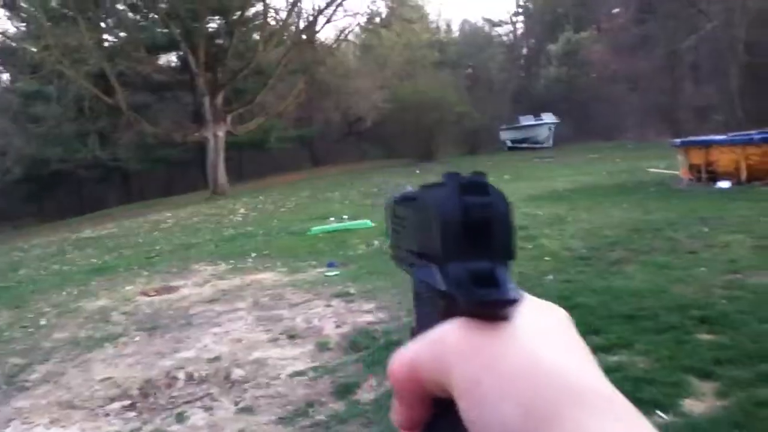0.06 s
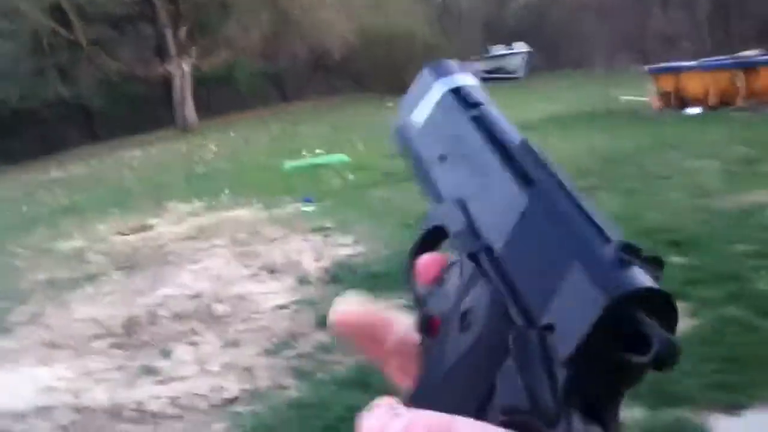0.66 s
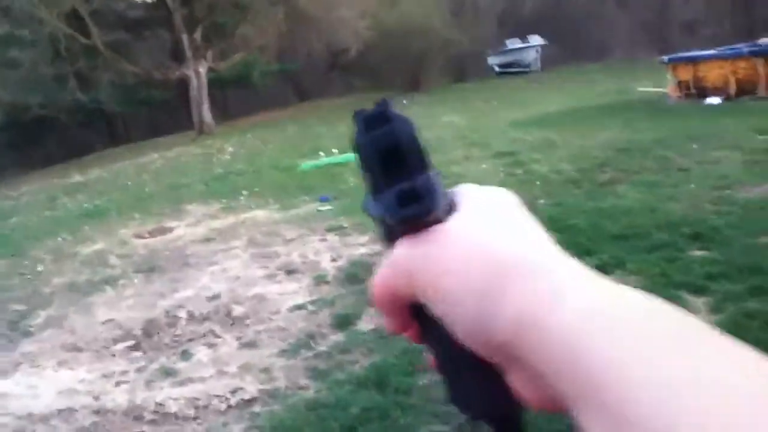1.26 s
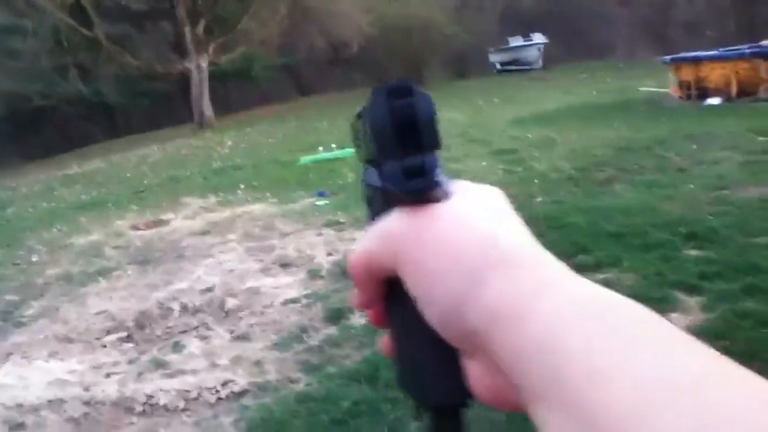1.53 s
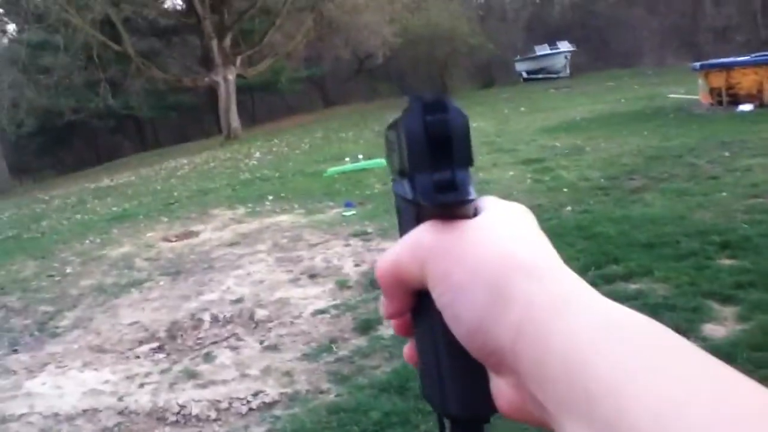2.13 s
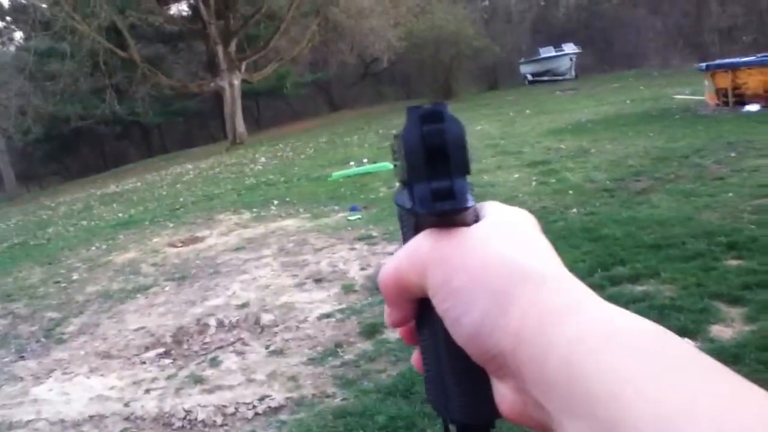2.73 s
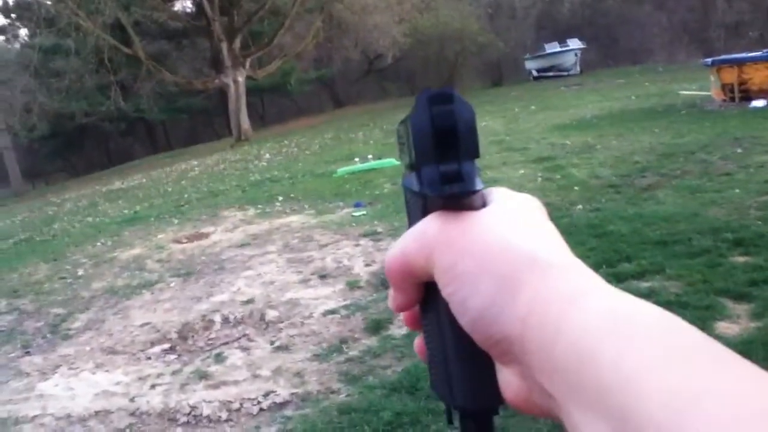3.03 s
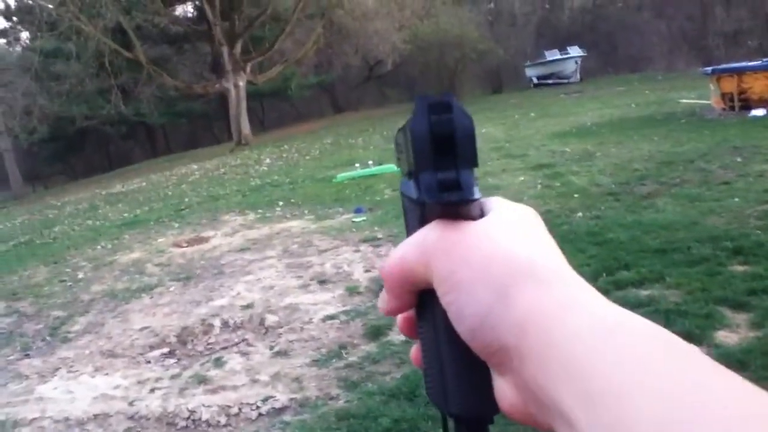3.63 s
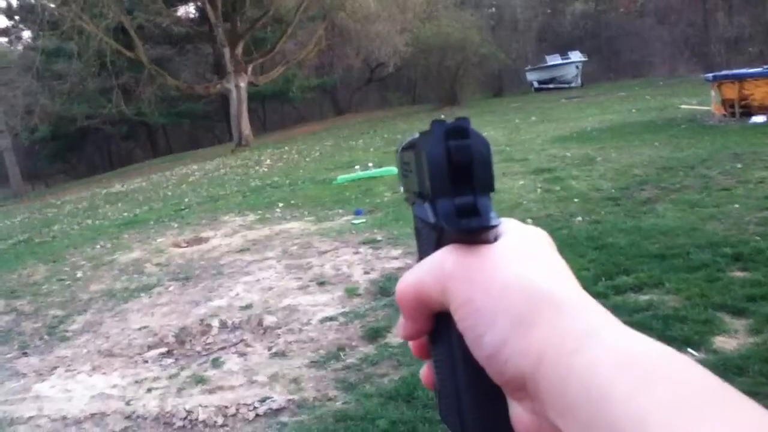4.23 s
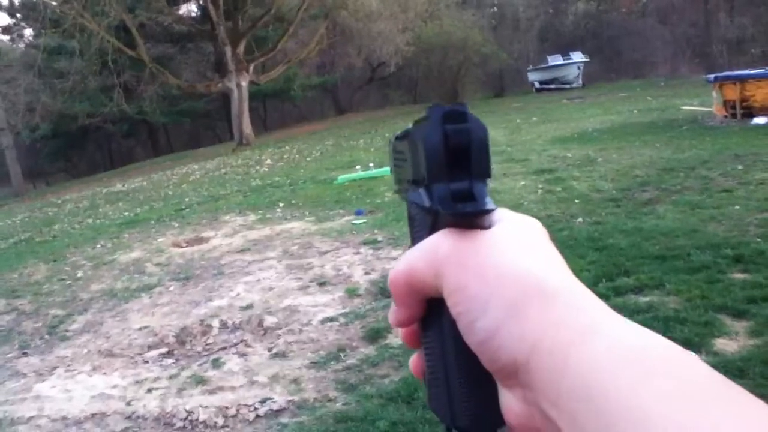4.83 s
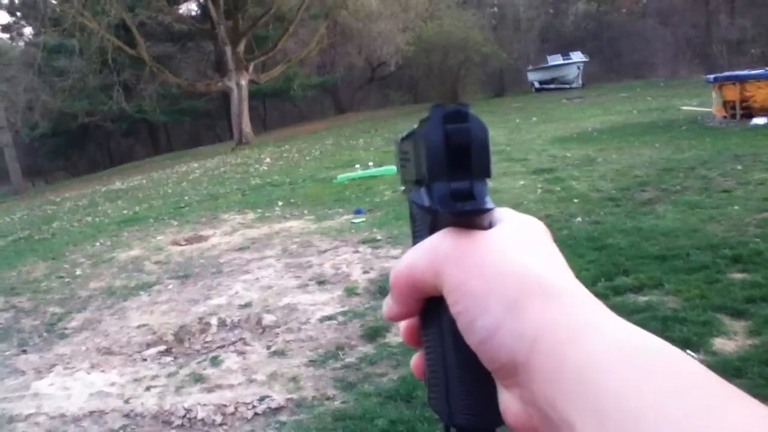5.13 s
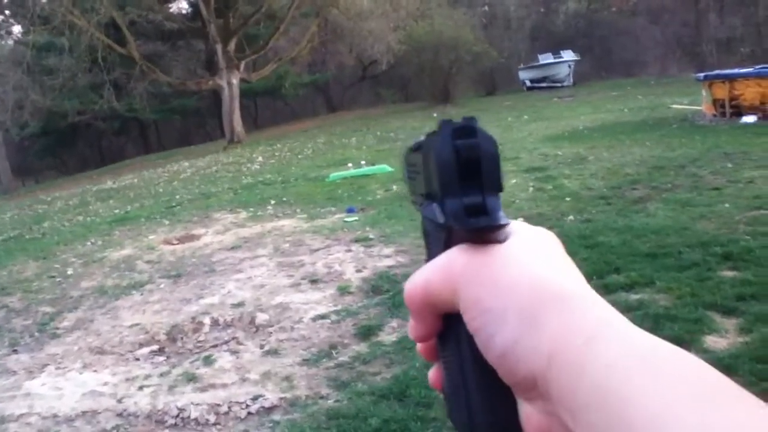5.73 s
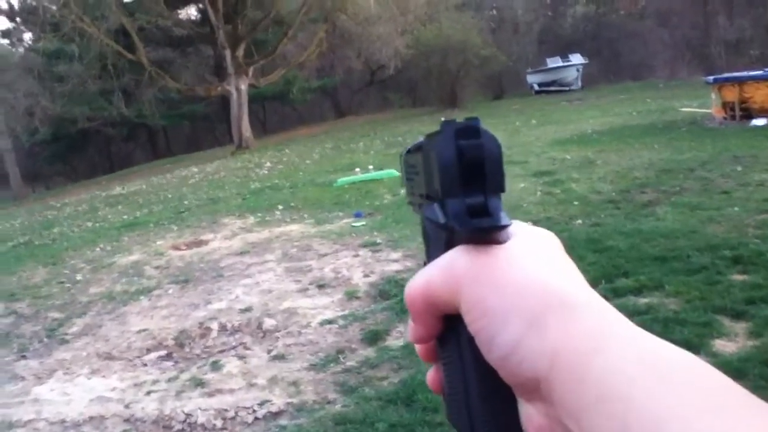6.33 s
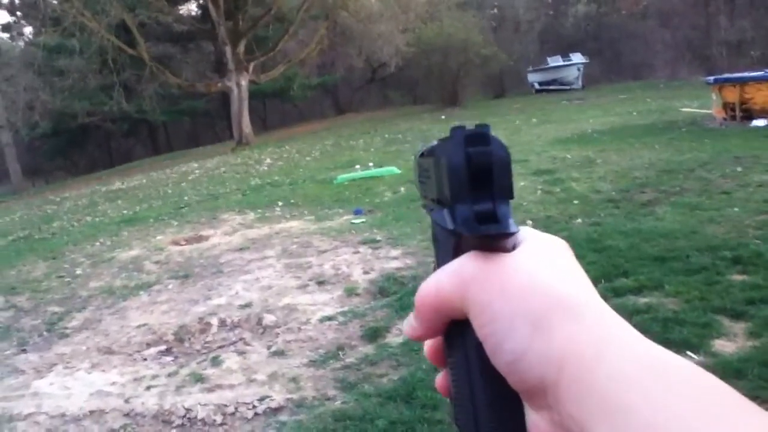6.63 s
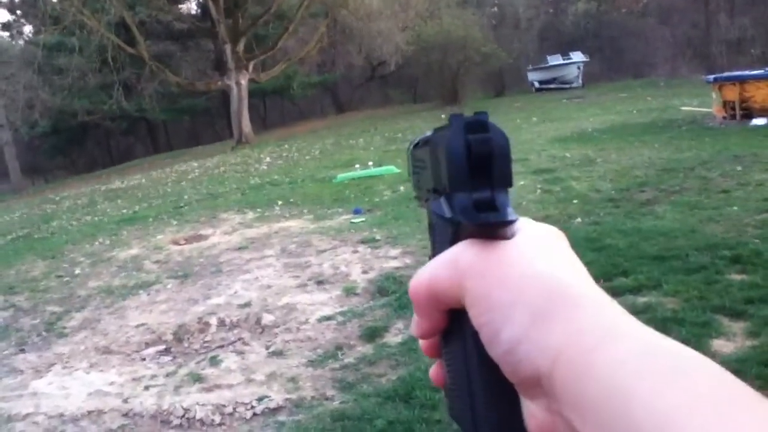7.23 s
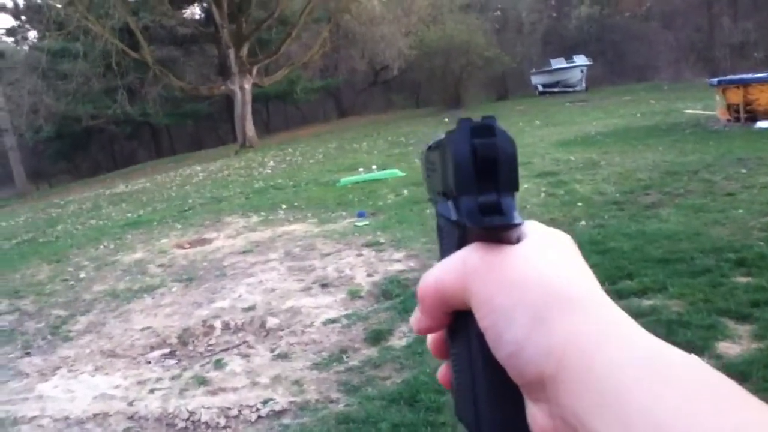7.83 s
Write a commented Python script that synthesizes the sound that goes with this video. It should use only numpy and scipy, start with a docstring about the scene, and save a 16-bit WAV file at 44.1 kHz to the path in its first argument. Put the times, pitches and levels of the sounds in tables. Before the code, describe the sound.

Faint songbirds repeat short, high phrases outdoors over a distant rumble and an even hiss, singing on and off until about 6 seconds. In the first second a pistol knocks lightly in the hand, most clearly at 0.6 seconds. At 2.8 seconds its trigger clicks and the mechanism cocks with a slight springy ring. The gas-powered BB pistol then fires close by at about 3.2, 4.8, 6.3 and 7.5 seconds, each shot a sharp burst of gas with a thump and snap, followed by a short wash of echoes from the trees. Between shots the trigger clicks back, settles, and clicks and cocks again. At 6.4 seconds, just after the third shot, a BB cracks against a hollow target that rattles and booms. The overall volume drops at each shot and slowly creeps back.

```python
"""A gas-powered BB pistol is cocked and fired four times, at arm's length, on a lawn edged by woods.
Each shot is a burst of CO2 gas, a thump and a snap, which the lawn and the trees scatter back.
Small sprung parts click between shots, and one BB hits a hollow target that rattles and booms.
Songbirds repeat short phrases, some of them slowing, over a distant rumble and an even hiss.
An automatic volume control turns everything down at each shot and lets it creep back."""
import sys
import numpy as np
from scipy import signal
from scipy.fft import rfft, irfft, next_fast_len
from scipy.io import wavfile
from scipy.ndimage import uniform_filter1d, minimum_filter1d

SR = 44100
rng = np.random.default_rng(int(sys.argv[2]) if len(sys.argv) > 2 else 0)


def inscribe(sig):
    """Save sig as 16-bit PCM at rate SR to the path in sys.argv[1].

    A 1-D sig is mono; a 2-D sig holds one channel per row.
    Samples are clipped to [-1, 1] before scaling.
    """
    pcm = np.round(np.clip(np.atleast_2d(sig).T, -1, 1) * 32767)
    wavfile.write(sys.argv[1], SR, pcm.astype(np.int16))


N = 346978
T = np.arange(2 ** 16) / SR  # seconds since the start of one event


def undb(db):
    """Turn decibels into a number to multiply by."""
    return 10 ** (np.asarray(db) / 20)


def add(out, start_s, x):
    """Mix x into out, beginning at start_s."""
    i = max(int(start_s * SR), 0)
    out[i:i + len(x)] += x[:max(len(out) - i, 0)]


def level(x, db):
    """Scale x to an average (rms) level."""
    return x * undb(db) / np.sqrt(np.mean(x ** 2))


def burst(x, db):
    """Scale a short sound to the energy of one millisecond at this level."""
    return x * undb(db) / np.sqrt(np.sum(x ** 2) * 1000 / SR)


def colour(x, spectrum, tilt_db=0):
    """Filter x through (pitch_hz, level_db) points, made brighter by tilt_db per octave."""
    size = next_fast_len(len(x) // 2 + 1) * 2
    octave = np.log2(np.maximum(np.fft.rfftfreq(size, 1 / SR), 1))
    hz, db = np.transpose(spectrum)
    slope_db = tilt_db * np.maximum(octave, np.log2(hz[0]))
    gain = level(undb(np.interp(octave, np.log2(hz), db) + slope_db), 0)
    # this fold makes the filter ring only after a sound, never before it
    cepstrum = irfft(np.log(gain))
    cepstrum[1:size // 2] *= 2
    cepstrum[size // 2 + 1:] = 0
    return irfft(rfft(x, size) * np.exp(rfft(cepstrum)))[:len(x)]


def grit(spread_db):
    """Noise made of tiny impacts of uneven size."""
    return level(rng.standard_normal(len(T)) * undb(spread_db * rng.standard_normal(len(T))), 0)


def ring(tones, size=4096):
    """A struck part rings with its own tones; the wider a tone, the sooner it dies."""
    t = T[:size]
    return sum((-1) ** k * undb(db) * width * np.exp(-np.pi * width * t) * np.sin(2 * np.pi * hz * t)
               for k, (hz, width, db) in enumerate(tones))


def contact(chatter, decay_s, size=4096):
    """One hard hit followed by dying chatter."""
    force = rng.standard_normal(size) * np.exp(-T[:size] / decay_s)
    force *= chatter / np.sqrt(np.sum(force ** 2))
    force[0] += 1
    return force


def outdoors(x, echo_db, decay_s):
    """A sound with a soft tail of reflections."""
    tail = rng.standard_normal(len(T)) * np.exp(-T / decay_s) * (1 - np.exp(-T / .01))
    return x + undb(echo_db) * signal.fftconvolve(x, tail / np.sqrt(np.sum(tail ** 2)))[:N]


# tone colour of the distant rumble and hiss: pitch_hz, level_db
AIR_SPECTRUM = [(15, -52.5), (25, -16.5), (105, -2), (149, -1), (489, -16), (911, -13.5), (1940, -21),
                (2220, -23), (2610, -24), (2840, -27.5), (4740, -29), (6920, -30.5), (10700, -32.5),
                (14800, -36.5), (16000, -41.5)]


def air(level_db=-49.5):
    """A far rumble swells gently under an even hiss."""
    swell_db = .5 * np.interp(np.arange(N), np.linspace(0, N, 40), rng.standard_normal(40))
    noise = level(colour(rng.standard_normal(N), AIR_SPECTRUM), level_db)
    rumble = signal.sosfilt(signal.butter(1, 1200, fs=SR, output="sos"), noise)
    return noise + rumble * (undb(swell_db) - 1)


def note(glide, pitch_ratio, waver=.018):
    """A bird's nearly pure tone follows a pitch glide, unsteady and a little different every time."""
    times, hz = np.transpose(glide)
    t = np.arange(times[0], times[-1], 1 / SR)
    pitch_flutter = np.interp(t - times[0], np.arange(128) / 300, rng.standard_normal(128))
    level_flutter = np.interp(t - times[0], np.arange(128) / 300, rng.standard_normal(128))
    sung_hz = pitch_ratio * hz * (1 + waver * rng.standard_normal(len(hz)))
    pitch = uniform_filter1d(np.interp(t, times, sung_hz), SR // 400) * (1 + .02 * pitch_flutter)
    tone = np.sin(2 * np.pi * np.cumsum(pitch) / SR) * undb(3.5 * level_flutter)
    return tone * signal.windows.tukey(len(t), .45)


def whistle(length_s, pitch_hz, db):
    """A plain whistle that rises and falls slightly."""
    arch = [(0, .96 * pitch_hz), (length_s / 3, 1.015 * pitch_hz), (length_s, .98 * pitch_hz)]
    return undb(db) * note(arch, 1)


def phrase_fade(k, count, peak, fade_db=-2):
    """Change in dB of note k: none at the peak, fade_db half a phrase away from it."""
    return fade_db * (2 * (k / (count - 1) - peak)) ** 2


# the six pitch glides that make up one syllable of song: offset_s, pitch_hz
LEAD_IN_GLIDE = [(-.03, 2430), (-.018, 2500), (-.006, 2700)]
FLICK_GLIDE = [(-.008, 5000), (-.002, 5800), (.004, 6900)]
WARBLE_GLIDE = [(-.002, 4150), (.012, 3680), (.024, 3000), (.03, 3150), (.037, 2800), (.046, 2680),
                (.056, 2200)]
TURN_GLIDE = [(.022, 3200), (.031, 3950), (.037, 3520), (.045, 3400), (.054, 2950)]
ARCH_GLIDE = [(-.028, 4550), (-.017, 4790), (-.006, 4680), (0, 4750)]
DIP_GLIDE = [(.001, 4800), (.008, 4580), (.017, 4520), (.025, 4750)]
# song phrases: start_s, syllables (to be rounded), first_gap_s, gap_growth_s, pitch_ratio,
# loudest_point (0 to 1), warble_db, whistle_db, lead_in_db
SONG_PHRASES = [(.054, 5.8, .168, -.002, .985, .25, -46, -46.5, -54.5),
                (1.982, 4.7, 0.14, 0.0075, 1.01, 0.76, -50.5, -61, -51),
                (3.553, 6, .125, .01, 1.01, 0.4, -46.5, -52.5, -58),
                (5.317, 5.2, 0.16, -0.0000085, 1.01, 0.18, -48, -56.5, -54),
                (5.39, 2, .135, 0, 1.13, 0.38, -52, -66, -63)]


def birds():
    """Birds sing with both sides of the voice box, pipe and call; the woods blur it all."""
    out = np.zeros(N)
    for start_s, syllables, gap_s, growth_s, ratio, peak, warble_db, whistle_db, lead_db in SONG_PHRASES:
        count = round(syllables)
        parts = [(LEAD_IN_GLIDE, lead_db), (FLICK_GLIDE, lead_db - 9),
                 (WARBLE_GLIDE, warble_db), (TURN_GLIDE, warble_db - 3),
                 (ARCH_GLIDE, whistle_db - 2), (DIP_GLIDE, whistle_db)]
        for k in range(count):
            syllable_s = start_s + k * gap_s + growth_s * k * (k - 1) / 2
            pitch_ratio = ratio * (1 + .01 * rng.standard_normal())
            for glide, db in parts:
                gain = undb(db + phrase_fade(k, count, peak))
                add(out, syllable_s + glide[0][0], gain * note(glide, pitch_ratio, waver=.0072))
    for k in range(4):  # evenly spaced piping
        piping_db = -49 + phrase_fade(k, count=4, peak=.48)
        add(out, .466 + k * .155, whistle(length_s=.058, pitch_hz=2930, db=piping_db))
    add(out, 4.64, whistle(length_s=.13, pitch_hz=1280, db=-55))  # one low, far call
    through_leaves = outdoors(out, echo_db=-8, decay_s=.007)
    return outdoors(through_leaves, echo_db=-9, decay_s=.1)


# tone colour of a shot scattered by the lawn: pitch_hz, level_db
LAWN_SPECTRUM = [(40, -48.5), (100, -19), (250, -4), (400, -5), (1000, -9), (2100, -4.5), (3200, -9),
                 (7400, -8), (10000, -17), (16000, -41.5)]


def lawn(fade_from_s=.02, db=-10, falloff=1.64):
    """The ground nearby scatters a shot back, weaker the farther the sound has travelled."""
    arrival = 1 / (1 + (.0185 / (T + 1 / SR)) ** 14)
    fade = np.maximum(T / fade_from_s, 1) ** -falloff
    return undb(db) * colour(grit(spread_db=2) * arrival * fade, LAWN_SPECTRUM)


# tone colour of a shot scattered by the woods: pitch_hz, level_db
WOODS_SPECTRUM = [(150, -34.5), (300, -12.5), (520, -7), (850, -1.5), (1300, 2.5), (2600, 2), (7400, -7),
                  (14000, -51)]
# separate echoes of a shot: delay_s, relative_db, decay_s, pitch_hz, width_hz
TREE_ECHOES = [(.139, -22, 0.019, 2070, 5000), (.199, -30, 0.011, 546, 250),
               (.241, -23, 0.0021, 2800, 4000), (.29, -32, 0.0057, 2000, 2000),
               (.304, -27, .007, 1700, 2000), (.357, -35, 0.0026, 3500, 5000)]


def woods(db=-32, delay_s=.17, bass_fade_s=2.85, treble_fade_s=.69, patch_db=2):
    """Tree trunks send back a patchy wash of echoes; the air takes its treble first."""
    flicker = undb(1.5 * level(uniform_filter1d(rng.standard_normal(len(T)), SR // 100), 0))
    arrival = 1 / (1 + (delay_s / (T + 1 / SR)) ** 6)
    wash = colour(grit(spread_db=6.5) * flicker * arrival, WOODS_SPECTRUM)
    hz, t, cells = signal.stft(wash, SR, nperseg=256)  # a grid of pitch against time
    # each clump of trees returns its own colour
    patches = uniform_filter1d(rng.standard_normal(cells.shape), size=6, axis=0)
    patches = uniform_filter1d(patches, size=7, axis=1)
    cells = cells * level(undb(patch_db * level(patches, 0)), 0)
    # a fade time is how long a drop of 60 dB takes
    fade_rate = 1 / bass_fade_s + (1 / treble_fade_s - 1 / bass_fade_s) * (hz[:, None] / 8000) ** 1.62
    fade = undb(-60 * fade_rate * np.maximum(t - .24, -.04))
    out = undb(db) * signal.istft(cells * fade, SR)[1][:len(T)]
    for echo_s, echo_db, decay_s, pitch_hz, width_hz in TREE_ECHOES:
        band = signal.iirpeak(pitch_hz, pitch_hz / width_hz, SR)
        echo = level(signal.lfilter(*band, colour(grit(spread_db=-7), LAWN_SPECTRUM)), echo_db)
        add(out, echo_s, echo * np.exp(-T / decay_s) * (1 - np.exp(-T / .00039)))
    return out


# ringing tones of the hollow target: pitch_hz, width_hz, level_db
TARGET_TONES = [(217, 11, 1), (330, 17, -2), (350, 16, -3), (428, 22, -6), (555, 25, -11), (618, 23, -8.5),
                (816, 33, -4), (1025, 25, 3), (1150, 30, -6), (1330, 38, -7)]


def target(hit_s=6.386):
    """The BB cracks against something hollow, which rattles and booms."""
    crack = colour(contact(chatter=2.7, decay_s=.004), GAS_SPECTRUM, tilt_db=-1)
    crunch = colour(contact(chatter=8, decay_s=.026), LAWN_SPECTRUM, tilt_db=-1)
    boom = ring(TARGET_TONES, size=16384)
    rattle = signal.fftconvolve(contact(chatter=1.8, decay_s=.0092), boom)
    tree_echo = colour(contact(chatter=8, decay_s=.024), LAWN_SPECTRUM)
    out = np.zeros(N)
    add(out, hit_s, burst(crack, -10.5))
    add(out, hit_s, burst(crunch, -16.5))
    add(out, hit_s + .00408, burst(boom, -17))
    add(out, hit_s + .022, burst(rattle, -18))
    add(out, hit_s + .1, burst(tree_echo, -24.5))
    return outdoors(out, echo_db=-12, decay_s=.13)


# tone colour of the pistol's frame: pitch_hz, level_db
FRAME_SPECTRUM = [(500, -26), (1000, -0.5), (1600, 0.5), (2300, -2), (3600, 6.5), (5000, 1), (6300, -5),
                  (9000, -10.5), (16000, -34)]


def tick(db, tilt_db):
    """A light, dry tap on the frame."""
    return burst(colour(contact(chatter=1.45, decay_s=.0022), FRAME_SPECTRUM, tilt_db), db)


def click(tones, db):
    """A sprung part snaps over and rings, with a softer tap as it lands."""
    ringing = burst(signal.fftconvolve(contact(chatter=.45, decay_s=.0024), ring(tones)), db)
    tap = colour(contact(chatter=.5, decay_s=.0013), FRAME_SPECTRUM, tilt_db=2)
    add(ringing, 0, burst(tap, db - 8))
    return ringing


# ringing tones of the small catch (the pawl) and of the spring: pitch_hz, width_hz, level_db
CATCH_TONES = [(1570, 180, -3), (3100, 340, -16), (3720, 140, 0), (4900, 1140, -3), (6300, 190, 1.5),
               (7100, 230, -8), (8860, 300, -8.5), (11200, 600, -15)]
SPRING_TONES = [(4463, 14, -10), (4850, 11, -6), (5103, 12, -8), (5771, 10, 0), (5950, 10, -5),
                (6099, 8, 0), (7477, 12, -5)]
# tone colour of the sliding parts: pitch_hz, level_db
SLIDE_SPECTRUM = [(410, -61.5), (700, -25), (1170, -18), (1500, -5.5), (2270, -8), (3500, -4.5),
                  (4260, -5.5), (4800, 3), (5610, -3.5), (6150, -2.5), (8100, -5), (8990, -11.5),
                  (9990, -10.5), (11800, -24), (16000, -29.5)]
# the touch, latch and rattle of one cocking stroke: offset_s, relative_db, decay_s
COCKING_STROKE = [(-.002, -4.5, 0.00093), (0, 0.5, 0.003), (.0045, -7, .004)]
# pulls of the trigger: click_s, cock_s, cock_db, creep_length_s, creep_db
TRIGGER_PULLS = [(2.8123, 2.8855, -13, 0.01, -26.5), (4.3663, 4.4422, -12.5, 0.024, -28),
                 (5.781, 5.8283, -11.5, 0.017, -37), (7.083, 7.124, -11.5, 0.0066, -30)]


def trigger_pulls(spring_db=-24.5):
    """Each pull clicks the catch, creeps in two slips, then cocks the pistol and rings its spring."""
    out = np.zeros(N)
    for click_s, cock_s, cock_db, creep_s, creep_db in TRIGGER_PULLS:
        add(out, click_s, click(CATCH_TONES, db=-21.5))
        add(out, click_s + .007, tick(db=-38.5, tilt_db=3.5))  # the catch bounces once
        for lead_s in (creep_s, creep_s / 2):
            add(out, cock_s - lead_s, tick(creep_db, tilt_db=1))
        for offset_s, part_db, decay_s in COCKING_STROKE:
            scrape = colour(contact(chatter=1.8, decay_s=decay_s), SLIDE_SPECTRUM)
            tones = [(hz, width, db + 4 * rng.standard_normal()) for hz, width, db in SPRING_TONES]
            add(out, cock_s + offset_s, burst(scrape, cock_db + part_db))
            add(out, cock_s + offset_s, burst(ring(tones, size=16384), cock_db + part_db + spring_db))
    return out


# ringing tones of the trigger: pitch_hz, width_hz, level_db
TRIGGER_TONES = [(1640, 240, -5.5), (2350, 135, -1), (3504, 300, -1.5), (4500, 320, -5), (5630, 280, -11),
                 (6050, 240, -3.5), (9050, 400, -17.5)]
# letting go of the trigger: spring_back_s, settle_s, settle_db
TRIGGER_RELEASES = [(3.728, 3.8715, -23.5), (5.2468, 5.4982, -18.5), (6.6872, 6.8200, -24.5)]


def trigger_releases():
    """The trigger springs back, grazes its stop and settles against it."""
    out = np.zeros(N)
    for spring_back_s, settle_s, settle_db in TRIGGER_RELEASES:
        add(out, spring_back_s, click(TRIGGER_TONES, db=-15))
        add(out, settle_s - .0071, tick(db=-27, tilt_db=1.5))
        add(out, settle_s, tick(settle_db, tilt_db=0))
    return out


# knocks of the pistol in the hand: start_s, level_db
HAND_KNOCKS = [(.19, -40.5), (.398, -35.5), (.456, -34), (0.4616, -31.5), (.469, -35), (.497, -37),
               (0.599, -18), (0.6638, -34)]


def handling():
    """The pistol knocks as it is turned in the hand; softer knocks are duller."""
    out = np.zeros(N)
    for start_s, level_db in HAND_KNOCKS:
        add(out, start_s, tick(level_db, tilt_db=1.2 + .08 * level_db))
    return out


# tone colour of the gas burst: pitch_hz, level_db
GAS_SPECTRUM = [(120, -31.5), (220, -9), (450, -20.5), (700, -9.5), (1140, -9.5), (1770, -2.5), (2700, -2),
                (3190, -6), (3760, 1), (4860, -5.5), (5400, -1.5), (8000, -5.5), (10300, -12),
                (12200, -20.5), (16000, -20.5)]


def muzzle(open_s, tilt_db, thump_db, body_db, thump_hz=115, body_hz=600, leak_db=-24):
    """Gas roars and crackles while the valve is open, its puff thumps, and the parts snap home."""
    valve = 1 / (1 + (T / open_s) ** 20)
    leak = undb(leak_db) * np.exp(-T / .02)
    roar = colour(grit(spread_db=4) * (valve + leak), GAS_SPECTRUM, tilt_db)
    shocks = np.zeros(len(T))
    shocks[(open_s * SR * rng.random(size=6)).astype(int)] = 1  # sudden jumps of pressure in the jet
    crackle = colour(shocks, GAS_SPECTRUM, tilt_db=3)
    out = (burst(roar, 0) + burst(crackle, -7)) * np.sqrt(open_s * 1000)  # open longer, more energy
    thump = undb(thump_db) * np.exp(-T / .003) * np.cos(2 * np.pi * thump_hz * T + .25)
    low_mid_body = burst(ring([(body_hz, 260, 0)]), body_db)  # a short tone that colours the burst
    snap = colour(contact(chatter=1, decay_s=.0015), GAS_SPECTRUM, tilt_db=-2)
    add(out, open_s - .0015, -thump)
    add(out, open_s - .0015, -low_mid_body)
    add(out, .015, burst(snap, -2))
    return out


# the shots: start_s, muzzle_db, valve_open_s, tilt_db_per_octave, thump_db, body_db, echo_db
# (thump_db and body_db are relative to muzzle_db)
PISTOL_SHOTS = [(3.233, -2, 0.0095, -1, -4, -7.5, -5.5), (4.778, -1, 0.0078, -1, -1.5, -12.5, -5.5),
                (6.259, -1, 0.00723, -1.5, -1.5, -32.5, -7.5), (7.4804, 2.5, 0.007, -1.4, -3.5, -25, -3)]


def shots():
    """The hammer is released, gas bursts from the muzzle, and the lawn and woods answer."""
    out = np.zeros(N)
    for start_s, muzzle_db, open_s, tilt_db, thump_db, body_db, echo_db in PISTOL_SHOTS:
        hammer = colour(contact(chatter=3, decay_s=.002), SLIDE_SPECTRUM)
        add(out, start_s - .0022, burst(hammer, -22.5))
        add(out, start_s, undb(muzzle_db) * muzzle(open_s, tilt_db, thump_db, body_db))
        add(out, start_s, undb(echo_db) * (lawn() + woods()))
    return out


def scene():
    """Everything that reaches the one microphone."""
    firing = shots()
    clicks = outdoors(trigger_pulls() + trigger_releases() + handling(), echo_db=-29, decay_s=.03)
    return (firing + clicks + target() + birds() + air())[None]


def record(dry, limit_db=-12, recovery_db_per_s=6, bass_cut_hz=45, treble_cut_hz=15800):
    """The volume drops at once on a loud sound and recovers slowly; peaks are rounded, the top is cut."""
    power = uniform_filter1d(dry[0] ** 2, SR // 125)
    cut_db = np.minimum(limit_db - 10 * np.log10(np.maximum(power, 1e-12)), 0)
    early_cut_db = minimum_filter1d(cut_db, SR // 80)  # starts just ahead of the peak
    recovery_db = recovery_db_per_s * np.arange(N) / SR
    gain_db = np.minimum.accumulate(early_cut_db - recovery_db) + recovery_db
    small_mic = signal.butter(1, bass_cut_hz, "high", fs=SR, output="sos")  # loses deep bass
    rounded = np.tanh(signal.sosfilt(small_mic, dry) * undb(gain_db))
    return signal.sosfilt(signal.ellip(8, .2, 70, treble_cut_hz, fs=SR, output="sos"), rounded)


dry = scene()
out = record(dry)
inscribe(out)
```